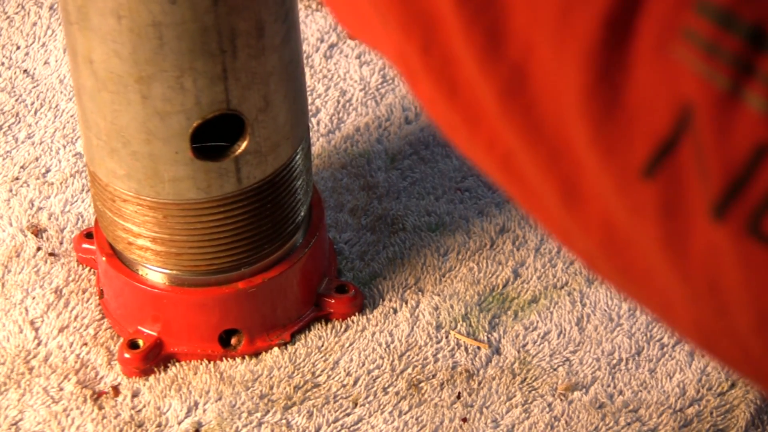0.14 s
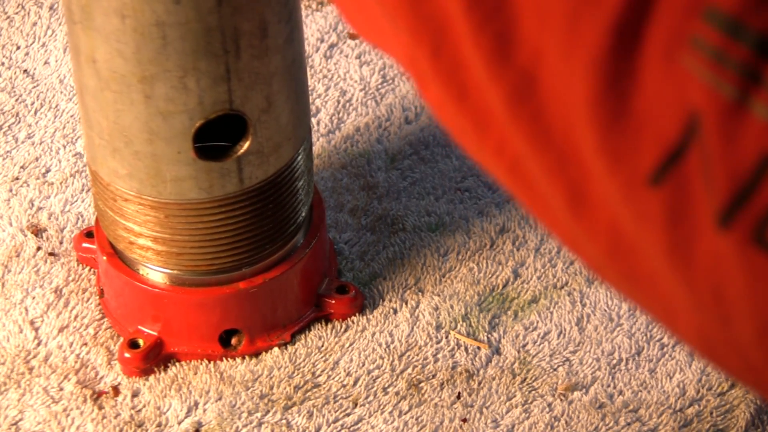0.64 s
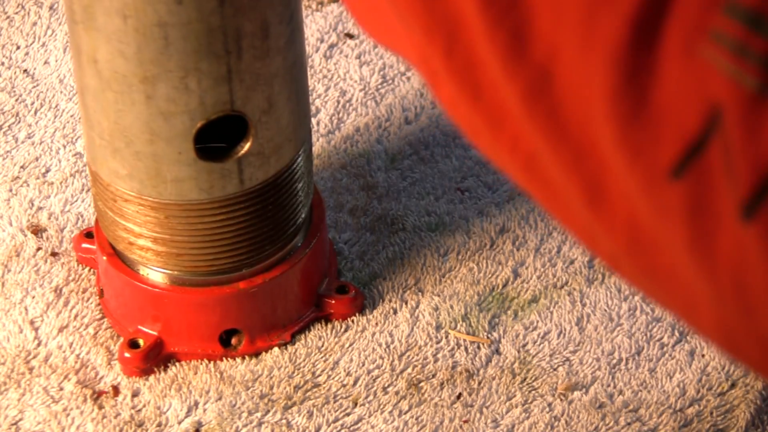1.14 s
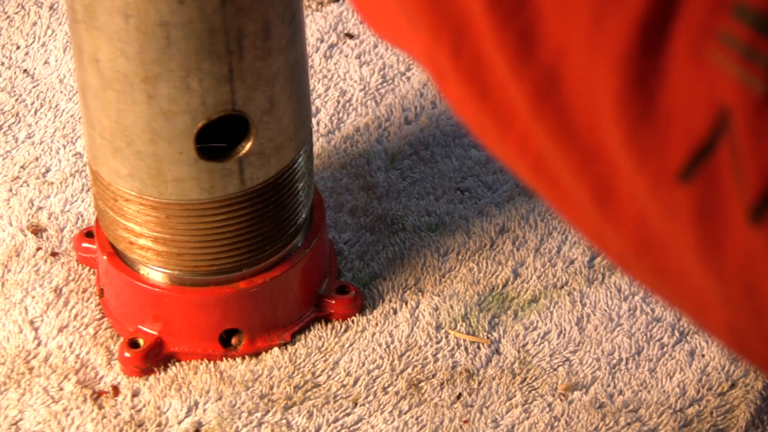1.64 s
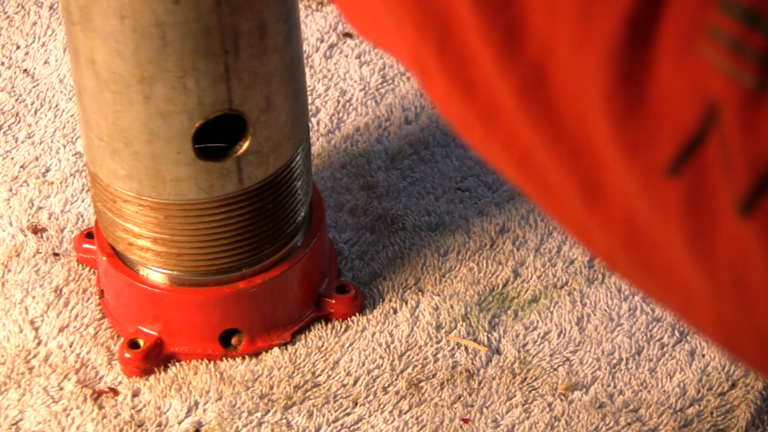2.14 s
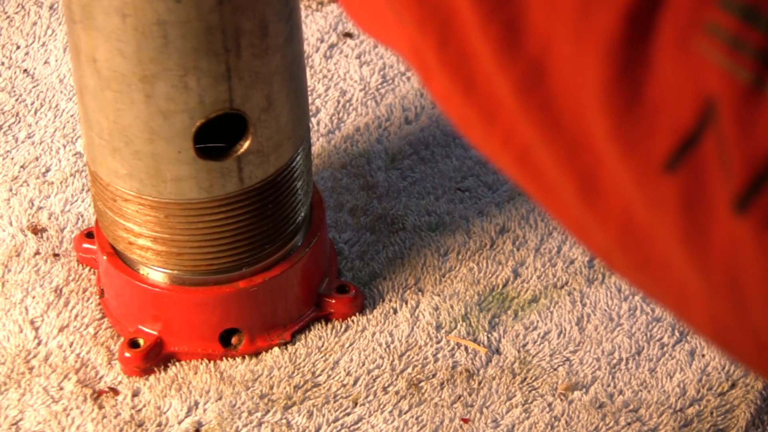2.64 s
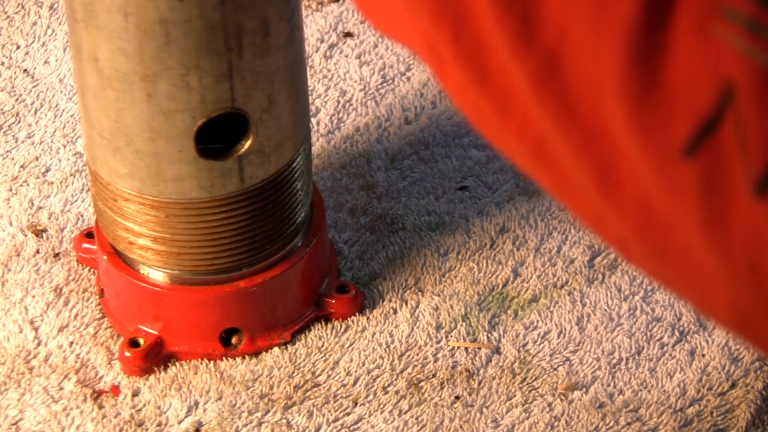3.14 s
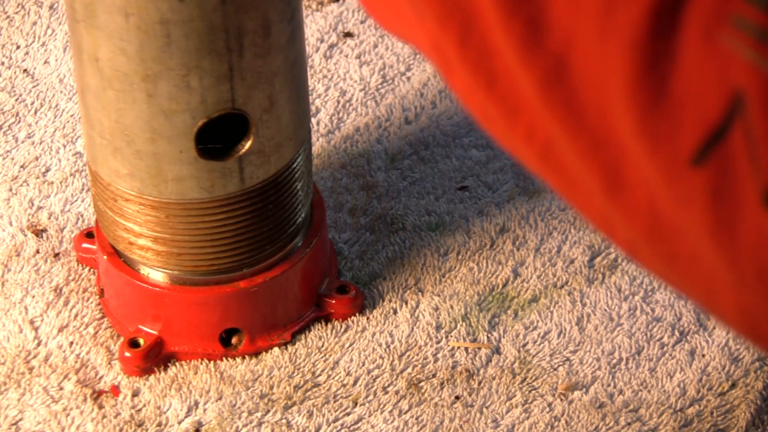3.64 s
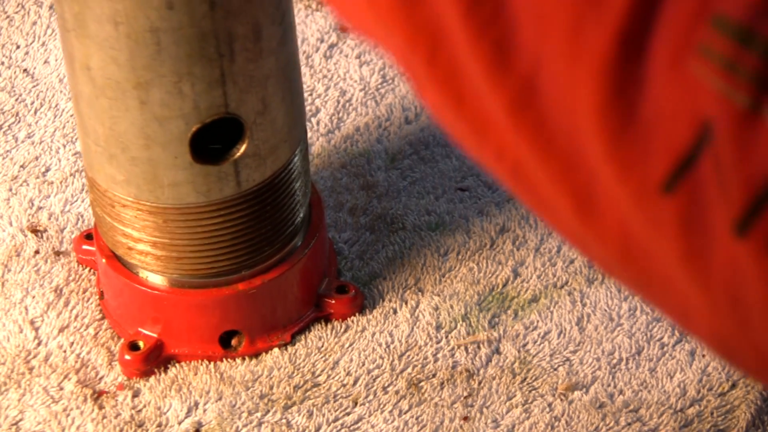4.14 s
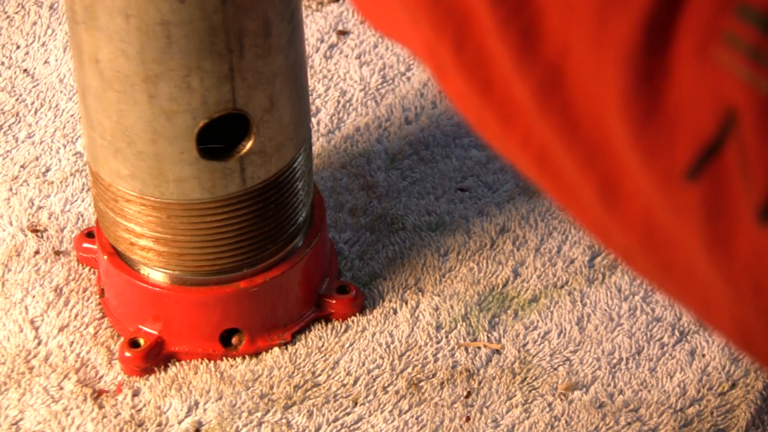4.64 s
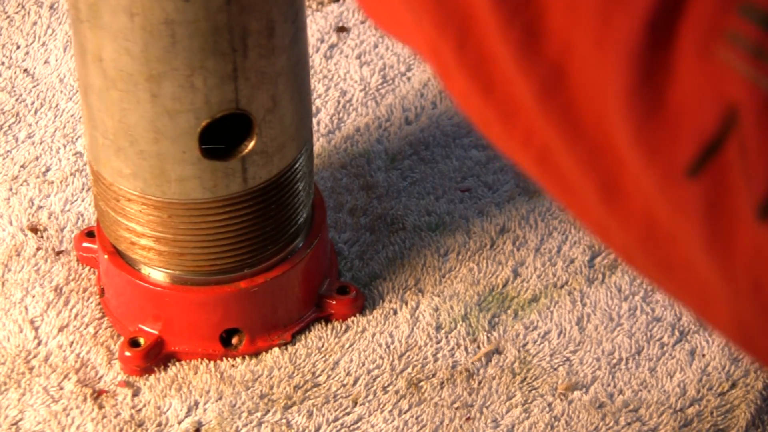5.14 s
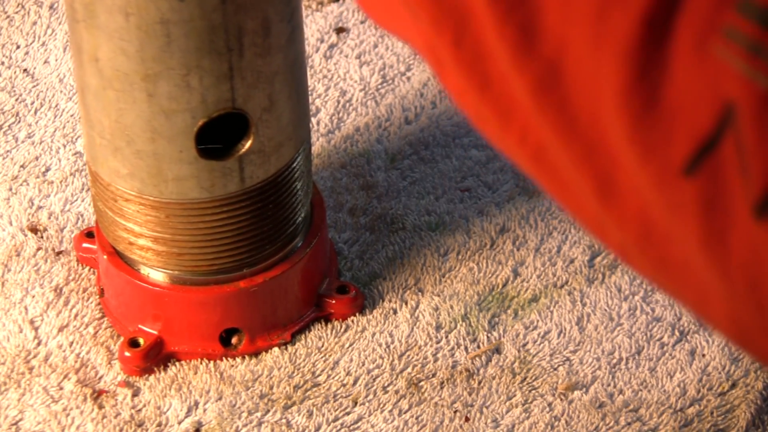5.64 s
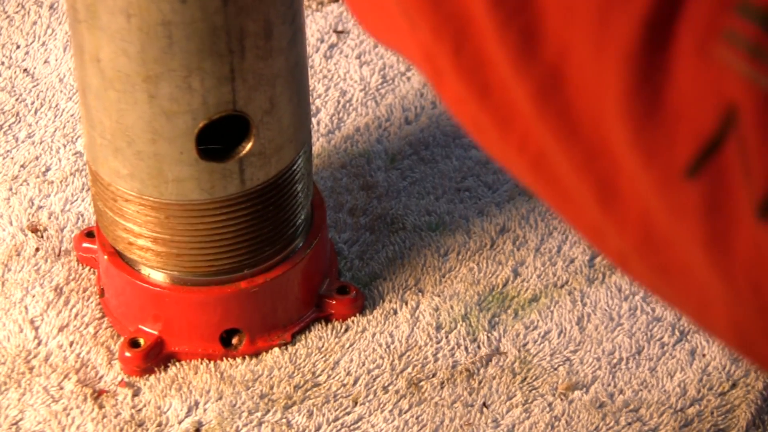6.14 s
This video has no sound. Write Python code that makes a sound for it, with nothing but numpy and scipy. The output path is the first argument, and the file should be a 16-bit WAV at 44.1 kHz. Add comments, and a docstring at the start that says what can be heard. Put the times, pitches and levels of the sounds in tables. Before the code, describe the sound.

A close microphone in a workshop hears a hammer on a steel pipe standing on a small housing over carpet. At the start the metallic ring of an earlier blow dies away. A light clink comes at 0.3 seconds, then a heavy blow at 0.9, with a faint dull rebound at 1.25. Another blow lands at 1.9, a tap at 2.4, a very hard blow at 2.9, a tap at 3.8 and a blow at 4.2, followed by a muffled clunk at 4.4. Tap and blow then alternate: 4.7, 5.2, 5.6, and a last heavy blow at 6.1, still ringing near the end. Heavy blows crack, thud and boom through the floor, distorting at their peaks; the pipe rings high and short, with thin whistling overtones from the hammer head. Taps are lighter, clearer and shorter. Short room reverberation and low, steady humming air lie underneath.

```python
"""A hammer strikes a steel pipe that stands on a small housing on a carpeted workshop floor.
At first the ring of an earlier heavy blow dies away; then light taps and heavy blows mostly take turns, to the end.
At each hit decaying sines ring the pipe and noise bursts crack; low modes and a dull knock follow from the floor.
Two dull rebounds leave the pipe silent. Filtered noise makes the room's tail and its steady air throughout.
Heavy blows boom through housing and floor, fill the room and overload the recorder into flat tops."""
import sys
import numpy as np
from scipy import signal
from scipy.io import wavfile

SR = 44100
rng = np.random.default_rng(int(sys.argv[2]) if len(sys.argv) > 2 else 0)


def int16_out(signal):
    """Quantize to a 16-bit WAV file."""
    q = np.round(np.clip(np.atleast_2d(signal).T, -1, 1) * 32767)
    wavfile.write(sys.argv[1], SR, q.astype(np.int16))


def voltage_ratio(decibels):
    """Convert decibels (scalar or array-like) to amplitude ratios, 20 dB per decade."""
    exponent = np.asarray(decibels, float) / 20
    return 10 ** exponent


N = 276763
RUN_IN = int(0.4 * SR)  # samples computed ahead of the audible start
EDGES = 22 * 2 ** np.arange(0, 9.7, 0.5)  # half-octave band edges in Hz

# Heavy blows of the hammer. Each row: start in seconds, relative thud level in dB, main ring level in dB,
# power share of the upper tone of the main pair (0-1), relative levels of the hammer head's low and high tone in dB.
BLOWS = [(-.25, 13.5, 0.5, .7, -62.5, -57), (.864, 12, -0.5, 0.4, -38.5, -37.5),
         (1.8672, 7.5, 1.5, 0.1, -61.5, -39), (2.886, 13.5, -0.5, .7, -29, -78),
         (4.189, 7.5, 1.5, 0.1, -46, -38), (5.165, 11, 3.5, 0.3, -38, -68),
         (6.090, 12, .5, 0.1, -36, -50.5)]
# Light taps that set the pipe. Each row: start in seconds, relative thud level in dB, relative crack level in dB,
# main ring level in dB, power share of the upper tone (0-1), relative overtone level in dB,
# pitch in Hz of the overtones that the landing spot favours.
TAPS = [(.318, -18.5, -25.5, -10, 1, -11.5, 4114), (2.4092, -14.5, -10.5, -7, 0.6, -3.5, 3390),
        (3.774, -15.5, -6.5, 4.5, 0, -11.5, 3850), (4.705, -9, -2.5, 1, 0.2, 0.5, 6960),
        (5.631, -8.5, -9, 4, 0, -3, 6680)]


def at_hz(points, hz, axis=1):
    """Interpolates a column of a table linearly along a log-frequency axis."""
    points = np.array(points)
    return np.interp(np.log(hz), np.log(points[:, 0]), points[:, axis])


def band_filter(low, high, x):
    """Band-pass filtering: keeps the part of a sound between two frequencies in Hz."""
    return signal.sosfilt(signal.butter(2, [low, high], "band", fs=SR, output="sos"), x)


def stereo_bands(size):
    """Interchannel coherence: bands of equally dense noise whose mid and side shares set left-right likeness."""
    # Left-right likeness of diffuse sound. Each row: frequency in Hz, likeness (0-1).
    likeness = [(50, 0.97), (300, 0.95), (1000, 0.93), (2500, 0.9), (5000, 0.29), (9000, 0.32),
                (14000, 0.11)]
    white = rng.standard_normal((2, 2, size))
    for k, (low, high) in enumerate(zip(EDGES, EDGES[1:])):
        # neighbouring bands draw on different noises
        mid, side = band_filter(low, high, white[k % 2])
        hz = np.sqrt(low * high)
        alike = np.clip(at_hz(likeness, hz), 0, 1)
        common = np.sqrt(1 + alike) * mid
        opposed = np.sqrt(1 - alike) * side * [[1], [-1]]
        yield hz, (common + opposed) / np.sqrt(2)


def strikes(times, db):
    """Impulsive excitation: one single-sample click per contact."""
    clicks = np.zeros(N + RUN_IN) + 1e-18
    clicks[np.round(times * SR).astype(int) + RUN_IN] = voltage_ratio(db)
    return clicks


def ring(clicks, hz, t60):
    """Damped resonance: a two-pole filter answers a unit click with a decaying sine of starting height 1."""
    r, w = voltage_ratio(-60 / (t60 * SR)), 2 * np.pi * hz / SR
    return signal.lfilter([0, np.sin(w)], [1, -2 * r * np.cos(w), r * r], clicks)


def knock(times, db, colour, click_db, length_s, tilt_db):
    """Broadband impact: a click and a decaying noise tail, coloured by band; a soft contact tilts the treble down."""
    soft_above_hz = 1800  # the tilt, in dB per octave, acts above this
    fade = voltage_ratio(-60 / (length_s * SR))
    noise = rng.standard_normal(N + RUN_IN)
    out = 0
    for low, high in zip(EDGES, EDGES[1:]):
        hz = np.sqrt(low * high)
        octaves_above = max(np.log2(hz / soft_above_hz), 0)
        clicks = strikes(times, db + at_hz(colour, hz) + tilt_db * octaves_above)
        grit = noise * signal.lfilter([1], [1, -fade], clicks)
        out = out + band_filter(low, high, voltage_ratio(click_db) * clicks + grit)
    return out


def room_air():
    """Stationary noise: rumble and hiss of the workshop, each band wavering slowly in level."""
    # Spectrum of the air. Each row: frequency in Hz, relative density in dB per Hz.
    air_colour = [(15, -70), (25, -45.5), (92, -13.5), (137, -11), (190, -6), (416, -15), (489, 0),
                  (531, -13.5), (1700, -32), (6210, -39.5), (6740, -47.5), (11600, -35), (16000, -54.5)]
    level_db, waver_db = -47, 1.0  # total rms; standard deviation of the waver
    out = 0
    for hz, noise in stereo_bands(size=N + RUN_IN):
        waver = np.interp(np.arange(N), np.linspace(0, N, 40), rng.standard_normal(40))
        out = out + voltage_ratio(at_hz(air_colour, hz) + waver_db * waver) * noise[:, RUN_IN:]
    return voltage_ratio(level_db) * out / np.sqrt(np.mean(out ** 2))


def workshop(x):
    """Reverberation: convolution with a diffuse tail that builds and dies by band, plus a faint longer far tail."""
    # Reverberant field. Each row: frequency in Hz, t60 in seconds, build-up time in seconds, level in dB.
    room_bands = [(40, 0.14, 0.01, -15.5), (115, 0.39, 0.019, -4.5), (390, 0.32, 0.0077, 1.58),
                  (1600, 0.36, 0.0067, -2), (3704, 0.35, 0.00057, 1), (7160, 0.3, 0.0013, 1),
                  (14300, 0.028, 0.002, 5.5)]
    far_db, far_stretch = -29.5, 2.8  # far tail: relative level, factor on t60
    t = np.arange(int(1.4 * SR)) / SR
    response = 0
    for hz, noise in stereo_bands(size=len(t)):
        t60, build_s, level_db = (at_hz(room_bands, hz, axis=k) for k in (1, 2, 3))
        near = voltage_ratio(-60 * t / t60)
        far = voltage_ratio(far_db - 60 * t / t60 / far_stretch)
        shape = (1 - np.exp(-t / build_s)) * (near + far)
        response = response + voltage_ratio(level_db) * noise * shape / np.sqrt(np.sum(shape ** 2))
    return signal.fftconvolve(x[None], response, axes=1)[:, :N + RUN_IN]


def housing_and_floor():
    """Structure-borne sound: the contact cracks at once; low modes and a dull knock of housing and floor follow."""
    # Modes of housing and floor. One value per mode: pitch in Hz.
    floor_hz = [110, 192, 254, 340, 372, 400, 485, 560, 650, 786, 940, 1250, 1560, 2000]
    # One value per mode: level in dB relative to the thud.
    floor_db = [-12, -15, -14.5, -15.5, -4.5, -7.5, -15.5, -37.5, -29, 2, -36, -21.5, -15.5, -43]
    # One value per mode: t60 in seconds.
    floor_t60_s = [0.13, 0.15, 0.16, 0.04, 0.082, 0.098, 0.12, 0.069, 0.44, 0.036, 0.11, 0.16, 0.13, 0.049]
    # Dull rebounds that leave the pipe silent. Each row: start in seconds, relative thud level in dB,
    # clunk level in dB, treble tilt in dB per octave.
    bounces = [(1.254, -31.5, -21, 0.5), (4.3637, -14.5, -1.5, -20)]
    # Colours of thud, crack and clunk. Each row: frequency in Hz, relative density in dB per Hz.
    thud_colour = [(25, -11), (60, -16), (150, -6.5), (400, 3), (900, 2), (1600, -5), (3000, -34.5)]
    crack_colour = [(100, -12.5), (500, 0.5), (1300, 11.5), (2200, 6), (3600, 8.5), (5200, 0.5), (6800, 0),
                    (10000, -3.5), (16000, -14.5)]
    clunk_colour = [(100, -15.5), (400, 6), (1000, 10.5), (2200, 6.5), (4000, 0.5), (9000, -6.5),
                    (16000, -16.5)]
    thud_lag_s = 0.008
    blow_crack_db, blow_tilt_db, tap_tilt_db = -0.5, 2.5, 1  # tilts in dB per octave

    hits = [(s, db, blow_crack_db, blow_tilt_db) for s, db, *_ in BLOWS]
    hits += [(s, db, crack_db, tap_tilt_db) for s, db, crack_db, *_ in TAPS]
    contact_s, thud_db = np.transpose(hits + bounces)[:2]
    thud_s = contact_s + thud_lag_s
    modes = sum(ring(strikes(thud_s, thud_db + level_db), hz, t60)
                for hz, level_db, t60 in zip(floor_hz, floor_db, floor_t60_s))
    thud = knock(thud_s, thud_db + 19, thud_colour, click_db=15.0, length_s=0.038, tilt_db=0)
    hit_s, _, crack_db, tilt_db = np.transpose(hits)
    crack = knock(hit_s, crack_db + 4, crack_colour, click_db=19, length_s=0.03, tilt_db=tilt_db)
    bounce_s, _, clunk_db, tilt_db = np.transpose(bounces)
    clunk = knock(bounce_s, clunk_db, clunk_colour, click_db=21.5, length_s=0.028, tilt_db=tilt_db)
    return modes + thud + crack + clunk


def hammer():
    """Free vibration of a hard body: the hammer head sings two thin high tones, faint on taps."""
    # Tones of the hammer head. One value per tone: pitch in Hz.
    head_hz = [12180, 13190]
    # One value per tone: t60 in seconds.
    head_t60_s = [1.3, .75]
    tap_db = -78.5  # relative level of both tones on a tap
    hits = [(s, low_db, high_db) for s, *_, low_db, high_db in BLOWS]
    hits += [(s, tap_db, tap_db) for s, *_ in TAPS]
    s, *tones_db = np.transpose(hits)
    return sum(ring(strikes(s, db), hz, t60) for db, hz, t60 in zip(tones_db, head_hz, head_t60_s))


def pipe():
    """Modal synthesis: each hit rings all modes; after heavy blows a rattle blurs all but the main tones."""
    # Further modes of the pipe. One value per mode: pitch in Hz.
    mode_hz = [1750, 2300, 3070, 3340, 3460, 3570, 3840, 3950, 4065, 4670, 5672, 6450, 6650, 6765, 6840,
               7270, 7540, 8400, 8650, 8750, 9790, 10230, 10770]
    # One value per mode: level in dB relative to the hit's overtone level.
    mode_db = [-18, -20, -4, -16, -6, -12, -6, -9, -9, -14, 0, -9, -13, -6, -12, -13, -18, -15, -16, -12,
               -15, -19, -19]
    # One value per mode: t60 in seconds, before the hit's length factor.
    mode_t60_s = [.12, .1, .38, .15, .3, .2, .34, .3, .34, .22, .36, .25, .14, .22, .14, .2, .14, .18, .14,
                  .2, .17, .17, .12]
    # Overtone colour of heavy blows. Each row: frequency in Hz, relative level in dB.
    blow_overtones = [(2800, -7), (3300, -0.5), (3900, -3.5), (4670, 6.5), (5670, -18.5), (6600, 4.5)]
    # a faint tone between the main pair, then the pair; t60 before the length factor
    hz = np.r_[2781, 2769, 2812, mode_hz]
    base_t60_s = np.r_[0.52, 0.25, 0.3, mode_t60_s]
    after_db = -17  # the faint tone, which outlasts the pair
    blow_length, tap_length = 1.11, 0.54  # factors on every t60: taps ring shorter
    blow_over_db, over_per_thud = -18, 1.695  # a heavier blow wakes more overtones (dB per dB)
    spot_loss_db, spot_floor_db = 44, -15.5  # a tap's loss per octave from its favoured pitch, and the floor
    detune, spread_db = 0.0006, 1  # random relative pitch and level for each hit and mode
    calm_hz, rattle_hz = 4, 95  # standard deviation of the pitch jitter
    hold, steps = 176, 180  # samples for which each jitter value holds; values for each hit

    hits = []
    for s, thud_db, ring_db, upper, *_ in BLOWS:
        over_db = blow_over_db + over_per_thud * thud_db + at_hz(blow_overtones, hz[3:])
        hits.append((s, blow_length, ring_db, upper, over_db, rattle_hz))
    for s, _, _, ring_db, upper, tap_over_db, spot_hz in TAPS:
        loss_db = -spot_loss_db * abs(np.log2(hz[3:] / spot_hz))
        over_db = tap_over_db + np.maximum(loss_db, spot_floor_db)
        hits.append((s, tap_length, ring_db, upper, over_db, calm_hz))

    out = np.zeros(N + RUN_IN + SR)
    t = np.arange(hold * steps)[:, None] / SR
    chance = rng.standard_normal((len(hits), steps + 2, len(hz)))
    for (s, length, ring_db, upper, over_db, blur_hz), (shift, spread, *jitter) in zip(hits, chance):
        upper = np.clip(upper, 1e-3, 1 - 1e-3)  # keeps the logarithm finite
        main_db = ring_db + np.r_[after_db, 10 * np.log10([1 - upper, upper])]
        level_db = np.r_[main_db, over_db + mode_db] + spread_db * spread
        mode_blur_hz = np.r_[[calm_hz] * 3, np.full(len(mode_hz), blur_hz)]
        wavering_hz = hz * (1 + detune * shift) + mode_blur_hz * np.repeat(jitter, hold, axis=0)
        phase = 2 * np.pi * np.cumsum(wavering_hz, axis=0) / SR
        rings = voltage_ratio(level_db - 60 * t / (length * base_t60_s)) * np.sin(phase)
        start = round(s * SR) + RUN_IN
        out[start:start + len(t)] += rings.sum(axis=1)
    return out[:N + RUN_IN]


def scene():
    """Superposition: direct sound of pipe, floor and hammer, reverberation of pipe and floor, and room air."""
    tube, body = pipe(), housing_and_floor()
    head = hammer() * voltage_ratio([[2.5], [-2.5]])  # stronger on the left
    direct = tube + voltage_ratio(3.5) * body + head
    reverberant = workshop(voltage_ratio(-6.5) * tube + body)
    return (direct + reverberant)[:, RUN_IN:] + room_air()


def roll_off(x):
    """The treble ends steeply here."""
    return signal.sosfilt(signal.butter(12, 16360, fs=SR, output="sos"), x)


def record(dry):
    """Saturation and band limiting: the input overloads into flat tops, then loses lowest bass and highest treble."""
    clip_top, clip_hardness = 0.62, 63  # amplitude of the flat tops; sharpness of the bend
    clipped = dry / (1 + np.abs(dry / clip_top) ** clip_hardness) ** (1 / clip_hardness)
    bass_cut = signal.butter(1, 45, "high", fs=SR, output="sos")
    treble_cut = signal.cheby2(10, 60, 16500, fs=SR, output="sos")
    trimmed = signal.sosfilt(treble_cut, signal.sosfilt(bass_cut, clipped))
    return roll_off(trimmed)


dry = scene()
out = record(dry)
int16_out(out)
```